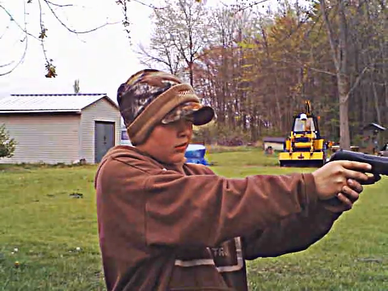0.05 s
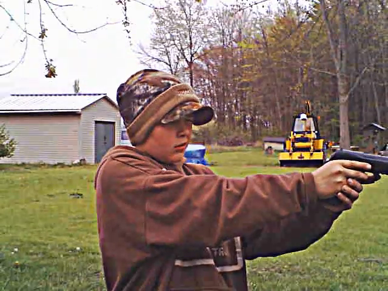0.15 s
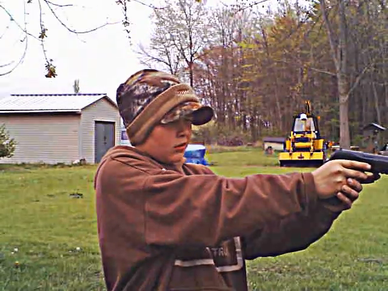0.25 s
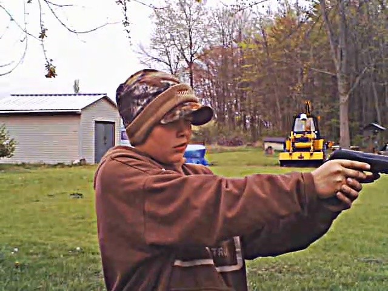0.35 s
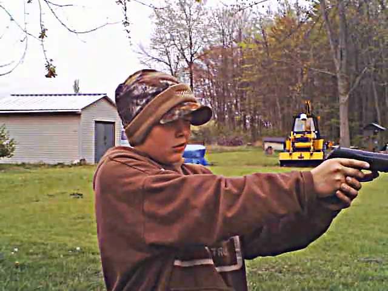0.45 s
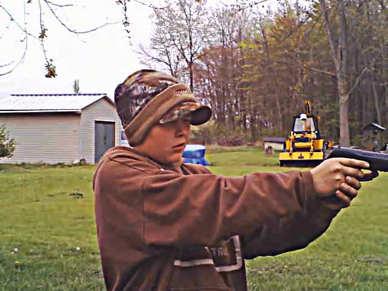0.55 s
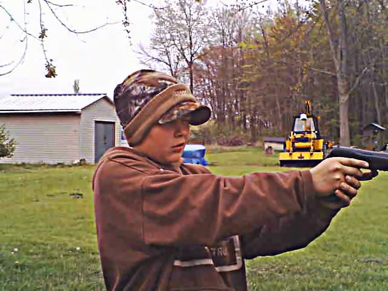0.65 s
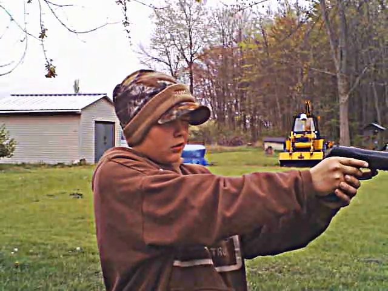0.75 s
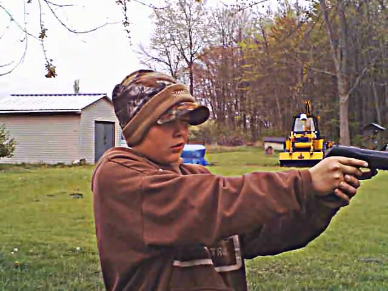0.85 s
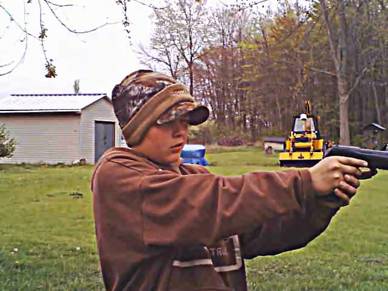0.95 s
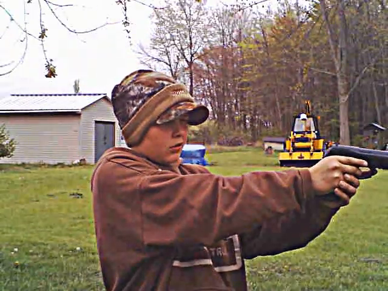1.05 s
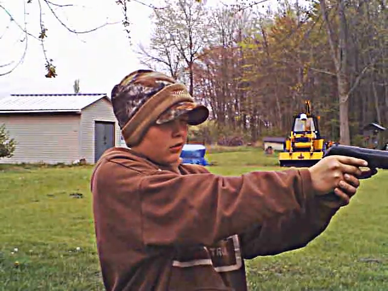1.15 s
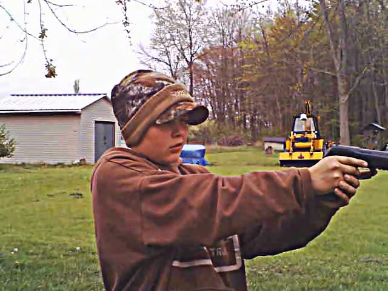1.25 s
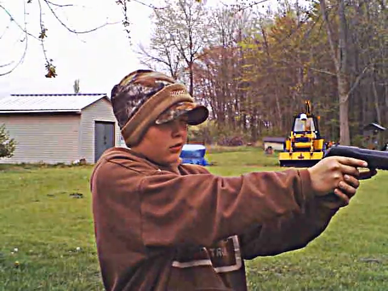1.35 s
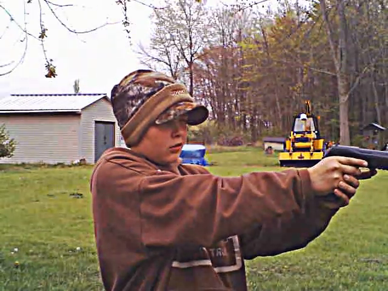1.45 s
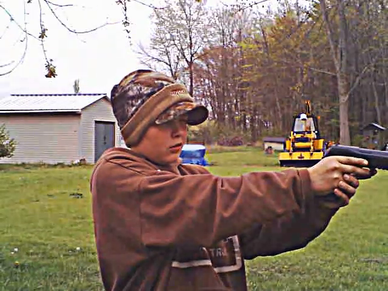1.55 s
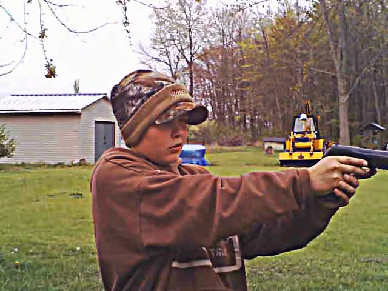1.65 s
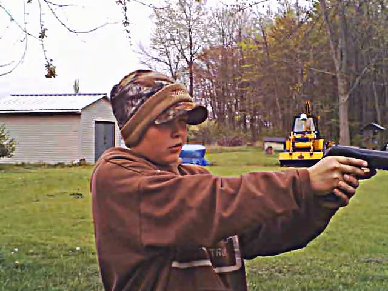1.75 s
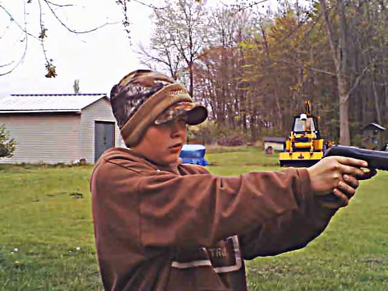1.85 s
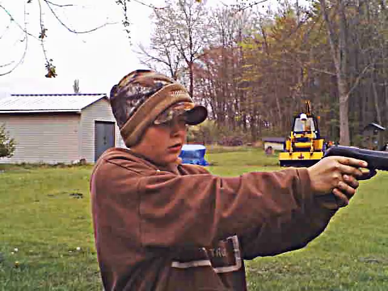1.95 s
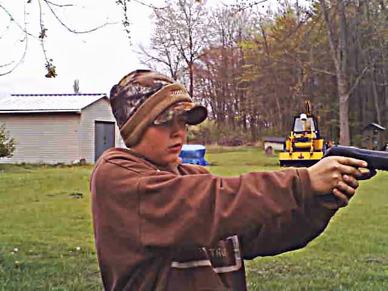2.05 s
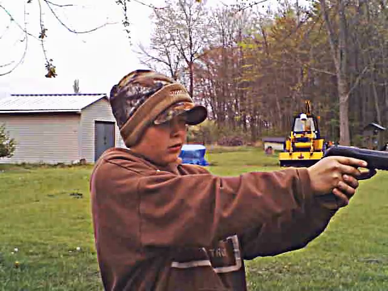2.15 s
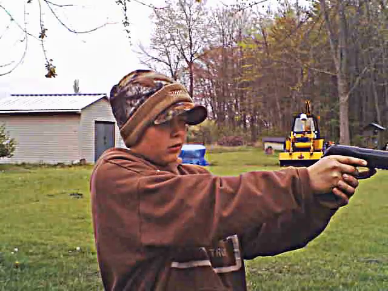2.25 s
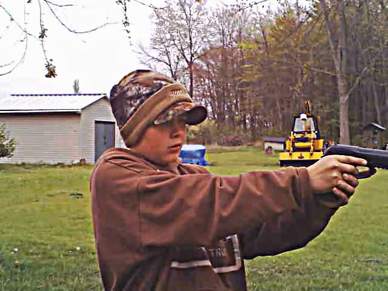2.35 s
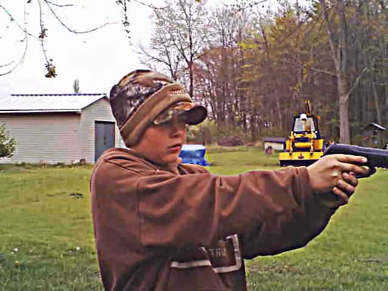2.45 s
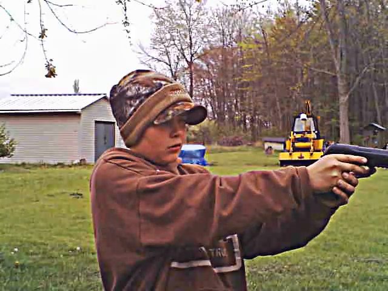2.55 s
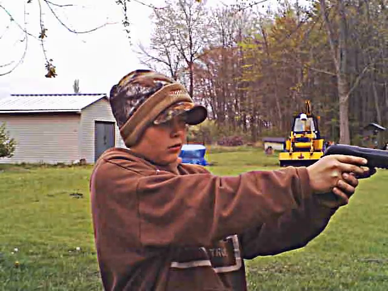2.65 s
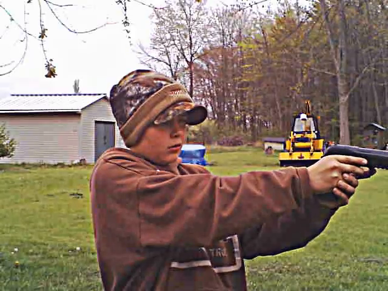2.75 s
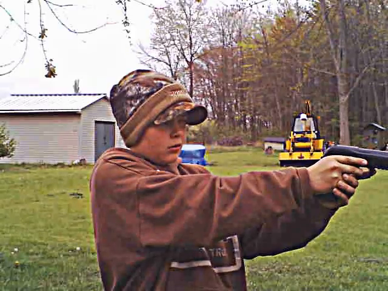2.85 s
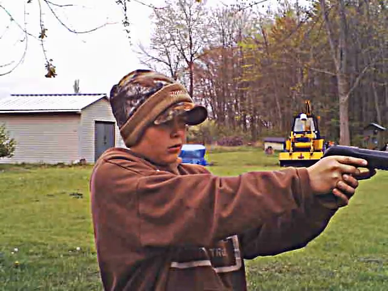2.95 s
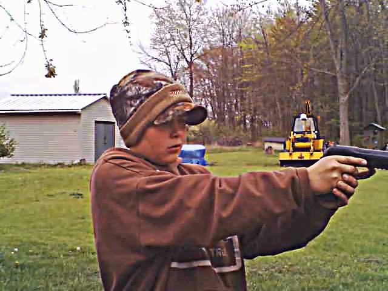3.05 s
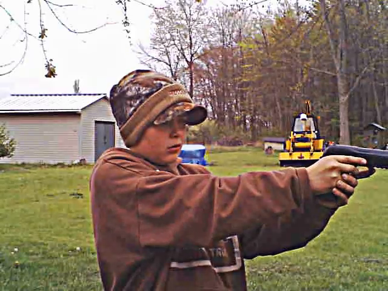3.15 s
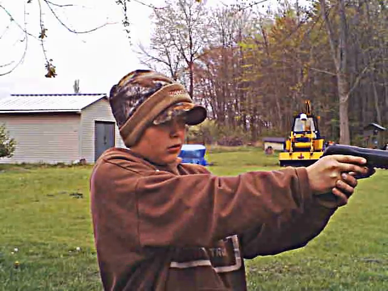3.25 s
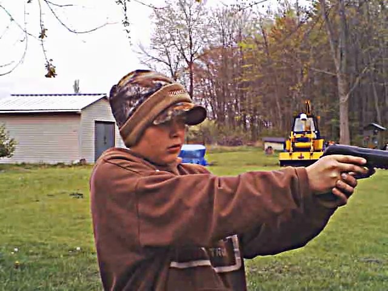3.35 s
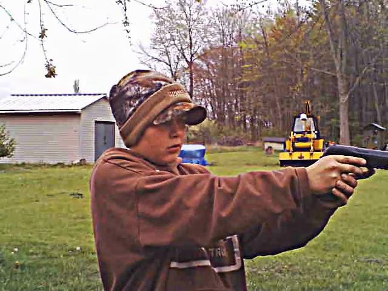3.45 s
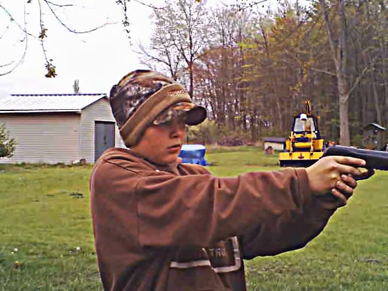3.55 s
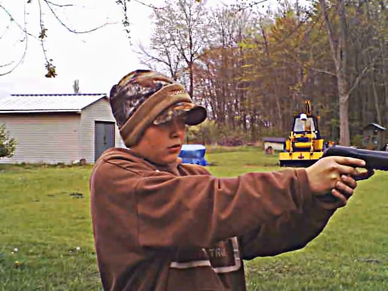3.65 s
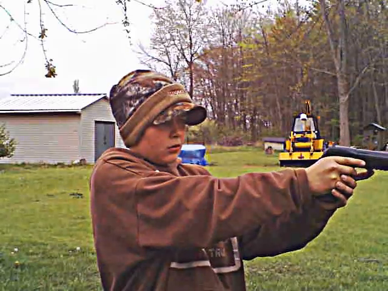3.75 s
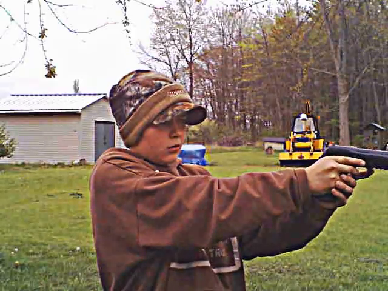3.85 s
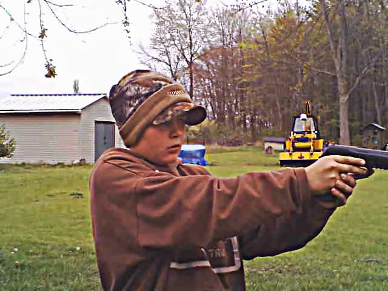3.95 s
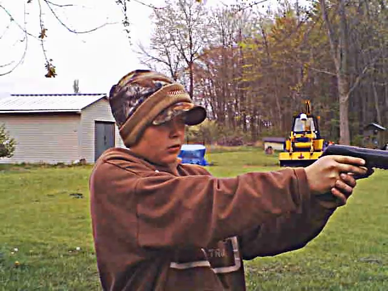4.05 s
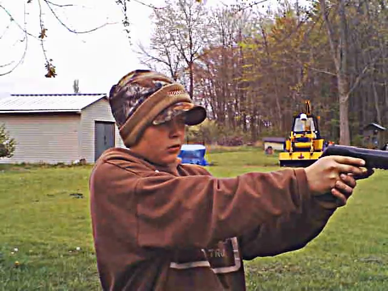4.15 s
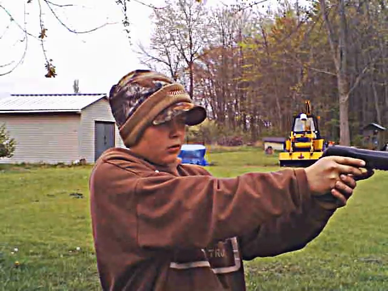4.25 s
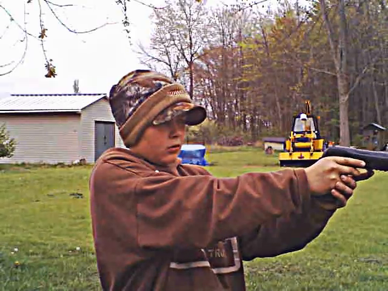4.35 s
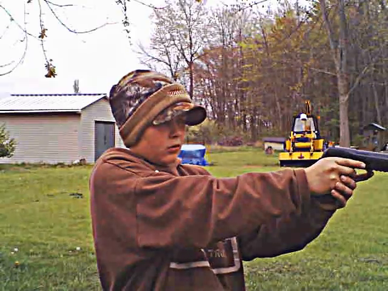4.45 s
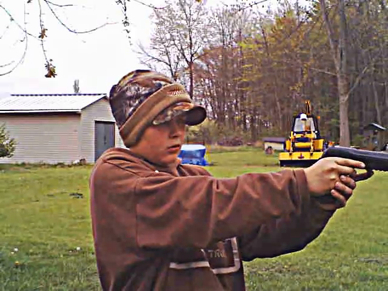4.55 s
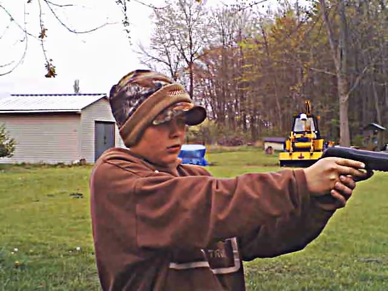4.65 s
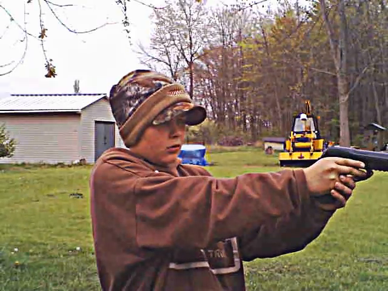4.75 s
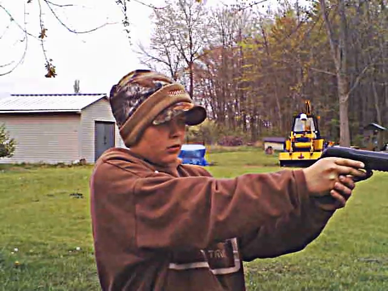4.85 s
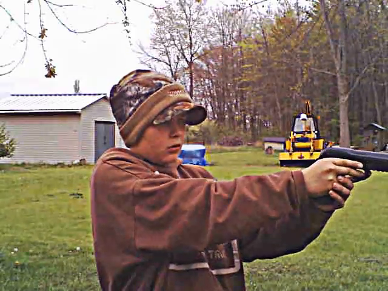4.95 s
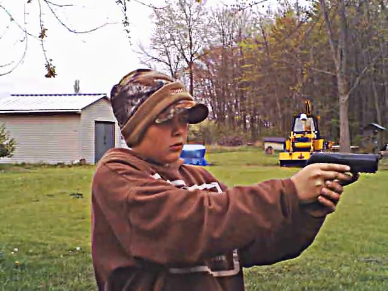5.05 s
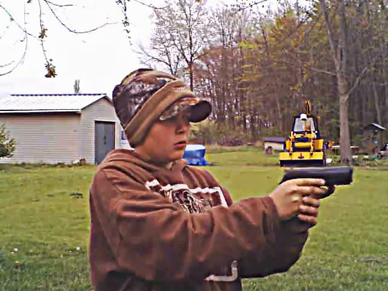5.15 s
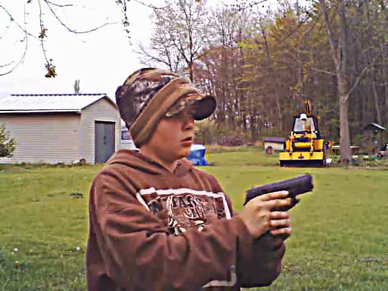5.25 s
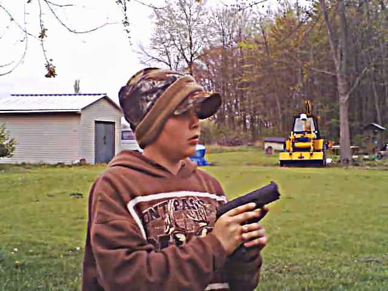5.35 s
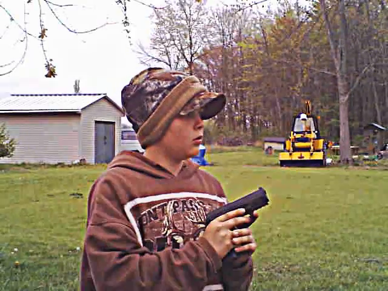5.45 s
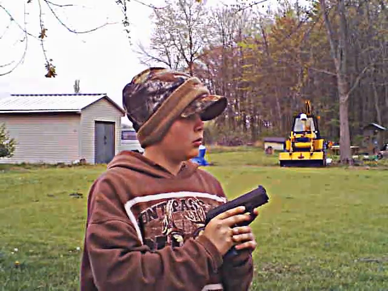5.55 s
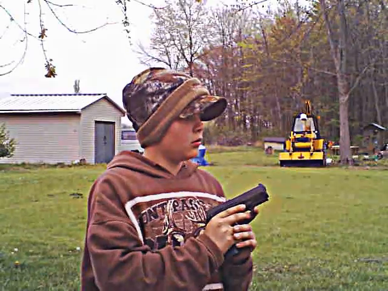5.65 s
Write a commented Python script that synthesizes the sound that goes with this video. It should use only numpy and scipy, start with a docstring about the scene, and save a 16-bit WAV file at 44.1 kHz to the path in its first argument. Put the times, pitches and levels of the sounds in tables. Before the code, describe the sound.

Five close air pistol shots pop outdoors, each with a brief metallic ring and echo, over quiet air and a faint buzz.

```python
"""Still outdoor air is heard first, with the faint chatter and whine of a camera. Then a trigger clicks and
a gas-powered BB pistol fires five shots in an open yard, an arm's length away. Each is a jet of gas that
cracks, sets barrel and steel ringing and overloads the microphone; sheds slap back and the edge of a wood
answers softly. The trigger springs back after every shot, and at the end a sleeve brushes once."""
import sys
import numpy as np
from scipy.fft import rfft, irfft, next_fast_len
from scipy.io import wavfile
from scipy.ndimage import uniform_filter1d, map_coordinates

SR = 44100
rng = np.random.default_rng(int(sys.argv[2]) if len(sys.argv) > 2 else 0)


def store_wav(level_fs):
    """Save 16-bit WAV to argv[1]."""
    pcm = np.round(np.clip(np.atleast_2d(level_fs), -1, 1) * 32767)
    wavfile.write(sys.argv[1], SR, pcm.T.astype(np.int16))


N = 250864

# the shots: firing t/s, trigger return t/s
SHOT_TIMES = [(1.4056, 1.6522), (2.3583, 2.5944), (3.1385, 3.3572), (3.8285, 4.0482), (4.5448, 4.7945)]
# spectrum of escaping gas: f/Hz, relative level/dB
HISS_SPECTRUM = [(1470, -33.5), (2500, -11.5), (3550, -8.5), (4340, -6.5), (5780, -4), (6700, 1.5),
                 (7250, -0.5), (10400, 2), (14800, -12.5), (16000, -14)]


def amp(db):
    """Amplitude ratio of a level in decibels."""
    return 10 ** (np.asarray(db) / 20)


def unit(x):
    """Normalisation to rms 1."""
    return x / np.sqrt(np.mean(x ** 2) + 1e-20)


def coloured(x, spectrum):
    """Spectral shaping by (f/Hz, level/dB) points on a log frequency axis, at rms 1."""
    size = next_fast_len(len(x) + 4096)
    hz, db = np.transpose(spectrum)
    gain = amp(np.interp(np.log(np.fft.rfftfreq(size, 1 / SR) + 1), np.log(hz), db))
    return unit(irfft(rfft(x, size) * gain, size)[:len(x)])


def noise(spectrum, size):
    """Filtered Gaussian noise at rms 1."""
    return coloured(rng.standard_normal(size), spectrum)


def wobble(t, rate):
    """Smooth random modulation: a spline through rate knots a second."""
    knots = (t - t[0]) * rate
    return map_coordinates(rng.standard_normal(int(knots[-1]) + 4), [knots])


def burst(t, attack, t60):
    """Exponential decay, 60 dB in t60 seconds, with a rise at t = 0."""
    t = np.maximum(t, 0)
    return (1 - np.exp(-t / attack)) * np.exp(-np.log(1000) * t / t60)


def spurt(t, rise, length):
    """A pulse envelope that rises at t = 0, holds and drops abruptly."""
    t = np.maximum(t, 0)
    return (1 - np.exp(-t / rise)) * np.exp(-(t / length) ** 4)


def ring(t, modes, attack, scatter_db):
    """Free vibration: damped modes of alternating sign, each at a slightly random strength."""
    sound = np.zeros(len(t))
    for k, (hz, db, t60) in enumerate(modes):
        strength = (-1) ** k * amp(db + scatter_db * rng.standard_normal())
        sound += strength * burst(t, attack, t60) * np.sin(2 * np.pi * hz * t)
    return sound


def add(track, start_s, sound):
    """Superposition of a sound on the track."""
    start = round(start_s * SR)
    track[start:start + len(sound)] += sound[:N - start]


def still_air():
    """Ambient noise: stationary and broadband, strongest in the bass."""
    # outdoor air: f/Hz, relative level/dB
    air_spectrum = [(20, -11), (120, -3), (250, -3), (400, -12.5), (1000, -15), (2000, -22.5), (3300, -26),
                    (5000, -29), (8000, -30), (9500, -33), (11000, -31), (15000, -33.5), (16000, -36.5)]
    return amp(-52.5) * noise(air_spectrum, N)


def breeze(gust_s=1.92, half_width_s=.2, gust_edge_hz=33):
    """Pressure fluctuations of moving air: a drifting rumble and one soft gust on the microphone."""
    # moving air: f/Hz, relative level/dB
    rumble_spectrum = [(15, -0.5), (30, -0.5), (60, 2.5), (110, -4), (250, -26.5), (1000, -60.5)]
    t = np.arange(N) / SR
    rumble = amp(-55 + .6 * wobble(t, rate=1)) * noise(rumble_spectrum, N)
    swell = np.exp(-np.square((t - gust_s) / half_width_s))
    gust = amp(-48) * swell * noise([(gust_edge_hz, 0), (10 * gust_edge_hz, -80)], N)
    return rumble + gust


def camera(step_hz=271, hunt_hz=28.28, roughness=.7):
    """A gated impulse train: the focus motor buzzes in short, uneven runs over an electronic whine."""
    # motor buzz: f/Hz, relative level/dB
    motor_spectrum = [(150, -25), (270, -2), (540, 4.5), (1400, 2), (2050, -12), (2500, -3.5), (3300, -4),
                      (4000, -9.5), (5600, -14), (6300, -2), (7200, -19), (9400, -19.5), (11600, -6.5),
                      (13400, -11), (16000, -31.5)]
    # electronic tone: f/Hz, rms level/dB
    whine_tones = [(14610, -67)]
    t = np.arange(N) / SR
    running = np.sin(2 * np.pi * hunt_hz * t) + .7 * wobble(t, rate=130) > -.15
    gate = uniform_filter1d(1. * running, size=40)
    # the steps come slightly unevenly, which blurs the pitch
    step_count = np.floor(t * step_hz + .13 * wobble(t, rate=40))
    steps = np.diff(step_count, prepend=0) > 0
    buzz = coloured(unit(steps - steps.mean()) + roughness * rng.standard_normal(N), motor_spectrum)
    whine = sum(amp(db) * np.sqrt(2) * np.sin(2 * np.pi * hz * t) for hz, db in whine_tones)
    return amp(-51) * gate * buzz + whine


def sleeve(brush_s=5.563):
    """Friction noise: a sleeve brushes once as the pistol is lowered."""
    t = np.arange(N) / SR
    cloth = noise([(300, -9), (1500, 4), (4000, -3), (7000, -22)], N)
    return amp(-45) * burst(t - brush_s, .0016, .036) * cloth


def trigger():
    """Impact transients: the linkage snaps, short on the pull and looser on the way back."""
    # the trigger takes up: t/s, relative level/dB
    pulls = [(0.7168, -28), (1.8647, -35), (2.2089, -24), (2.7995, -36), (3.0754, -26), (3.3184, -35),
             (3.7698, -28), (4.5126, -26)]
    # snap of the linkage: f/Hz, relative level/dB
    snap_spectrum = [(200, -19), (800, -6.5), (1500, 2), (3300, -5.5), (5000, 0), (6500, -6.5), (8500, 1),
                     (10500, -5.5), (13000, -8.5), (16000, -16)]
    track, t = np.zeros(N), np.arange(SR // 4) / SR
    for pull_s, db in pulls:
        add(track, pull_s, amp(db - 4.8) * burst(t, .00033, .018) * noise(snap_spectrum, len(t)))
    for _, return_s in SHOT_TIMES:
        add(track, return_s, amp(-30.5) * burst(t, .0008, .034) * noise(snap_spectrum, len(t)))
    return track


def yard(t, reflectors):
    """Reflection and scattering: hard slaps from walls, a diffuse wash from lawn and trees."""
    # returns from walls, lawn and the edge of the wood: f/Hz, relative level/dB
    wall_spectrum = [(200, -25), (800, -11), (1500, 0), (3500, -1.5), (5000, -12.5), (10000, -16),
                     (16000, -32)]
    lawn_spectrum = [(150, -3), (700, 0.5), (3500, -2), (5000, -5.5), (10000, -6), (13000, -18),
                     (16000, -30)]
    tree_spectrum = [(150, -7.5), (500, 2), (2000, 4), (3500, 0), (5000, -10.5), (9000, -19),
                     (16000, -37.5)]
    # each wall returns one clean click, its edges a short smear
    clicks = sum(amp(db) * np.diff(1. * (t > delay), prepend=0) for delay, db in reflectors)
    smear_envelope = sum(amp(db) * burst(t - delay, .0001, .0092) for delay, db in reflectors)
    smear = amp(-18.5) * smear_envelope * rng.standard_normal(len(t))
    slaps = amp(-55.7) * coloured(clicks + smear, wall_spectrum)
    # the grass nearby throws back only the treble, a little later
    grass = amp(-30) * burst(t - .05, .0091, .14) * noise(HISS_SPECTRUM, len(t))
    lawn = amp(-40.8 + 2.5 * wobble(t, rate=250)) * burst(t, .04, 1.0) * noise(lawn_spectrum, len(t))
    tree_envelope = amp(-51 + 1.2 * wobble(t, rate=31)) * burst(t - .32, .013, 2.0)
    trees = tree_envelope * noise(tree_spectrum, len(t))
    return slaps + grass + lawn + trees


def report(t):
    """Jet noise and resonance: the hammer knocks the valve open, gas cracks out and the gun rings."""
    # hammer blow, muzzle jet and slower push of gas: f/Hz, relative level/dB
    hammer_spectrum = [(150, -12), (600, -4), (1500, 0), (2800, -6), (4500, -13), (9000, -10.5),
                       (16000, -22)]
    jet_spectrum = [(1500, -39.5), (2800, -22.5), (4100, -19.5), (4700, -7.5), (6000, -13.5), (7500, -7.5),
                    (8800, -8), (10000, -1), (11400, -3.5), (13000, -9), (14500, -13), (16500, -27)]
    puff_spectrum = [(80, -30), (140, -14), (250, -14), (450, -2.5), (800, -5.5), (1350, -1), (1900, -5.5),
                     (2700, -6), (3800, -7.5), (5500, -27.5)]
    # the crack and its returns from shooter and ground: delay t/s, level/dB, length t/s
    arrivals = [(.0002, 2.5, .0027), (.0046, -5.5, 0.0027), (.0094, 0.5, .0015), (.0136, -2.5, .0013)]
    # hollow modes of barrel and frame, bright modes of steel parts: f/Hz, relative level/dB, T60/s
    barrel_modes = [(149.7, -10, .13), (233.3, 5, .1), (277.7, -0.5, .115), (353, -8, 0.1),
                    (472, -1.5, .08), (525, -3, 0.12), (566, -3.5, .11), (657, -1, .11),
                    (752.6, -1.5, 0.087), (802.4, 0.5, 0.1), (886, -9, .08), (1044, -3.5, .1),
                    (1167, -6.5, 0.12), (1286, -5.5, .09), (1348, -4.5, 0.1), (1453, -10, .11),
                    (1652, -12.5, .09), (1766, -13.5, 0.14), (1896, -8.5, .08), (2000, -6, 0.11),
                    (2140, -15, 0.11), (2466, -9.5, .09)]
    steel_modes = [(4672, -1.5, 0.11), (5290, -2, 0.11), (5600, -5.5, .07), (6492, 2.5, .1),
                   (6660, -3.5, .1), (7526, -4, .07), (8200, 0, .08), (8630, 0.5, 0.11), (9300, -0.5, .07),
                   (9560, 5, 0.064), (10178, 2, 0.1), (9750, 1, 0.082), (10738, 0.5, .07),
                   (11430, -1, 0.051), (11734, -1, 0.068)]
    hammer = amp(-14.3) * spurt(t + .0052, rise=.005, length=.0092) * noise(hammer_spectrum, len(t))
    crack_envelope = sum(amp(db) * spurt(t - delay, .00032, length) for delay, db, length in arrivals)
    crack = crack_envelope * noise(jet_spectrum, len(t))
    # the puff gives the pop its body; the rest of the gas hisses away unevenly
    puff = amp(-14.7) * burst(t, .0016, .122) * noise(puff_spectrum, len(t))
    sputter = unit(amp(2.2 * wobble(t, rate=870)))
    hiss = amp(-5.5) * burst(t - .005, .009, .098) * sputter * noise(HISS_SPECTRUM, len(t))
    barrel = amp(-14.8) * ring(t, barrel_modes, attack=.0036, scatter_db=1.3)
    steel = amp(-23) * ring(t, steel_modes, attack=.0011, scatter_db=2.5)
    return hammer + crack + puff + hiss + barrel + steel


def pistol():
    """Direct sound plus echoes: the paths stay the same, so every shot has the same echo delays."""
    # clear slaps from sheds and machines: delay t/s, relative level/dB
    clear_echoes = [(.0549, -26.5), (.0667, -24), (.0753, -30), (.1002, -37), (.1194, -30), (.1292, -33.5),
                    (.136, -35.5), (.212, -38.5)]
    # smaller things scattered about the yard
    faint_echoes = [(delay, -43) for delay in rng.uniform(.14, .185, size=3)]
    lead_s = .01  # room for the hammer ahead of the crack
    track, t = np.zeros(N), np.arange(2 * SR) / SR - lead_s
    for fire_s, _ in SHOT_TIMES:
        add(track, fire_s - lead_s, report(t) + yard(t, clear_echoes + faint_echoes))
    return track


def scene():
    """Superposition of all sources in one channel."""
    return (still_air() + pistol() + trigger() + sleeve() + camera() + breeze())[None]


def record(dry):
    """Saturation and band limiting: the microphone input overloads on the cracks and cuts the top."""
    top_hz, transition_hz = 15950, 600
    saturated = np.clip(dry, -1, 1)
    size = next_fast_len(N + SR // 2)
    passband = np.clip((top_hz - np.fft.rfftfreq(size, 1 / SR)) / transition_hz + .5, 0, 1)
    return irfft(rfft(saturated, size) * passband, size)[:, :N]


dry = scene()
out = record(dry)
store_wav(out)
```